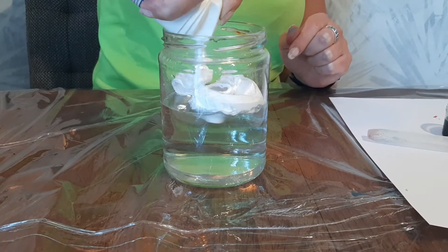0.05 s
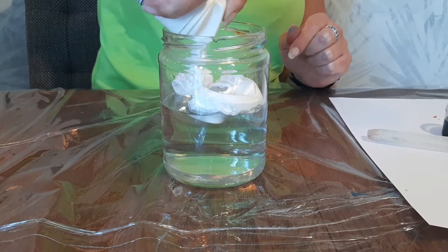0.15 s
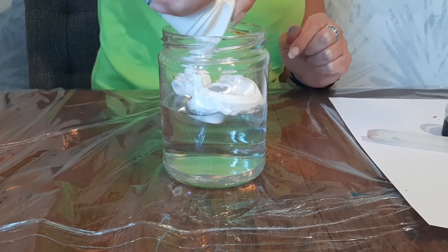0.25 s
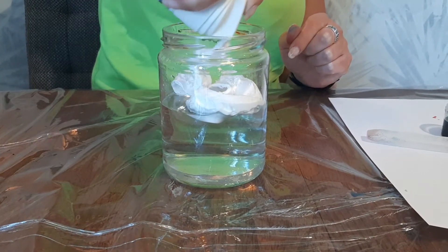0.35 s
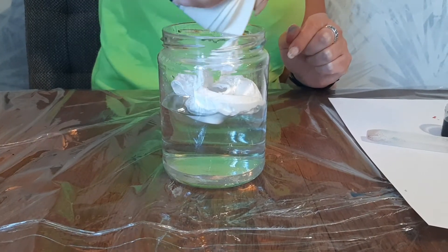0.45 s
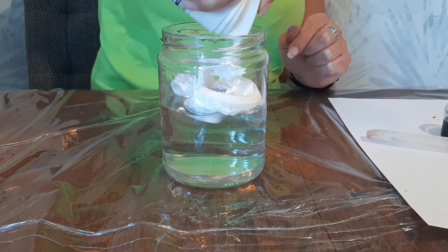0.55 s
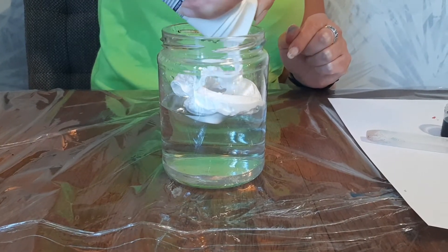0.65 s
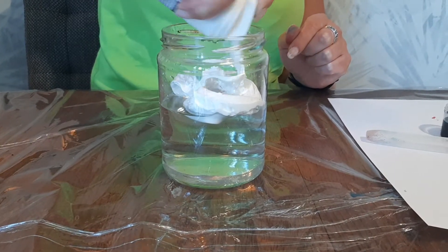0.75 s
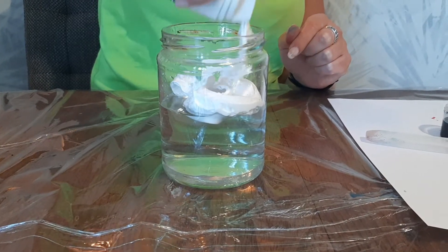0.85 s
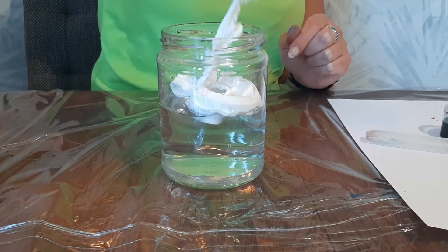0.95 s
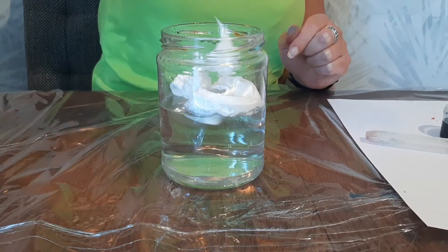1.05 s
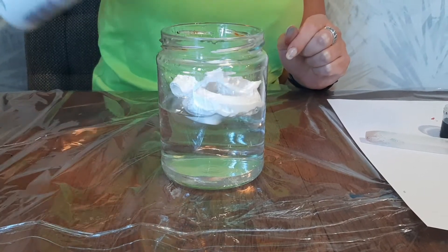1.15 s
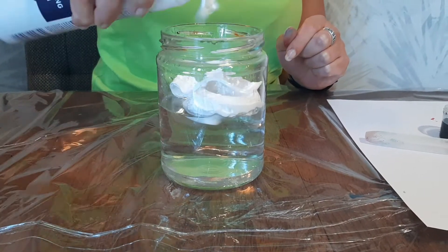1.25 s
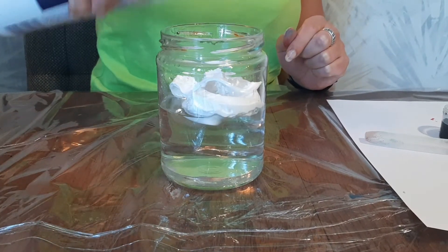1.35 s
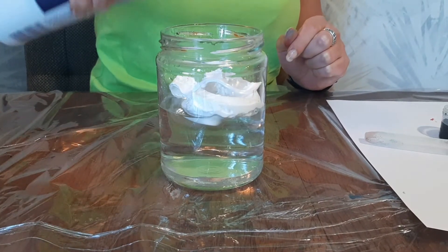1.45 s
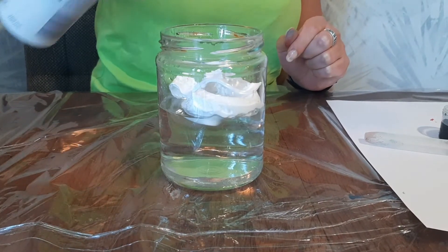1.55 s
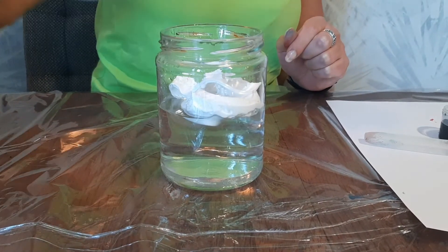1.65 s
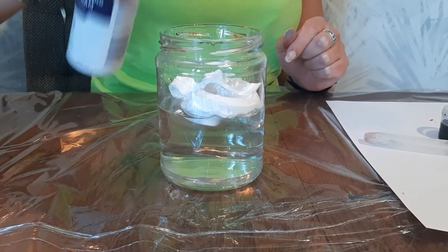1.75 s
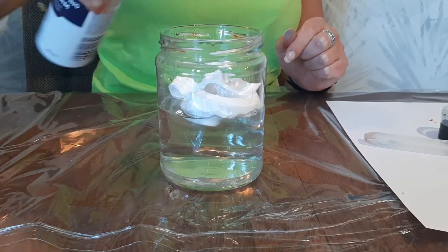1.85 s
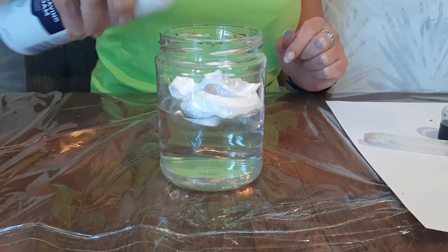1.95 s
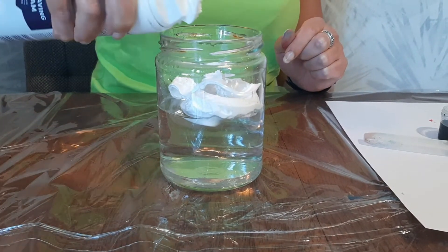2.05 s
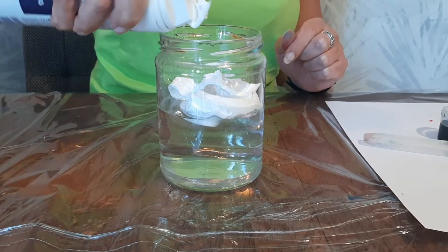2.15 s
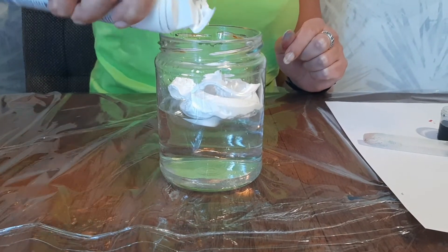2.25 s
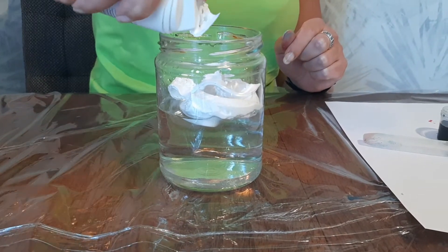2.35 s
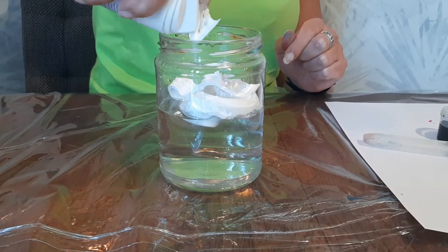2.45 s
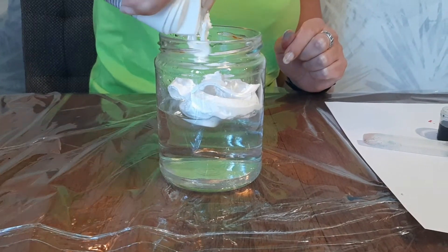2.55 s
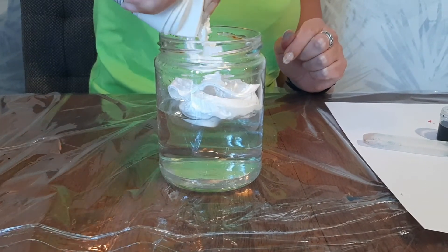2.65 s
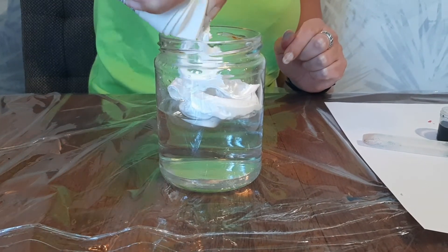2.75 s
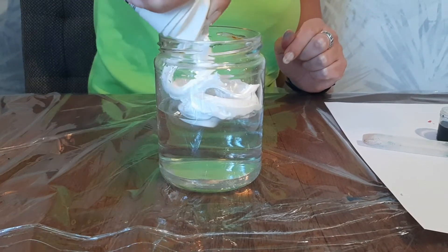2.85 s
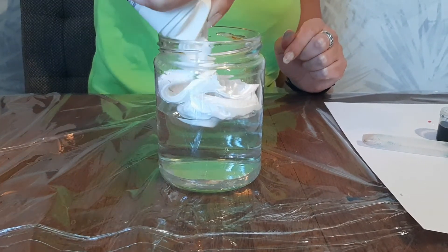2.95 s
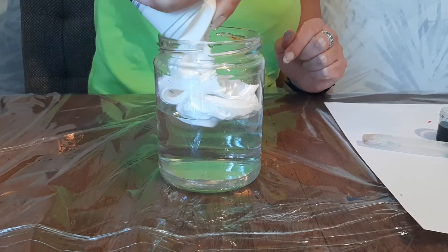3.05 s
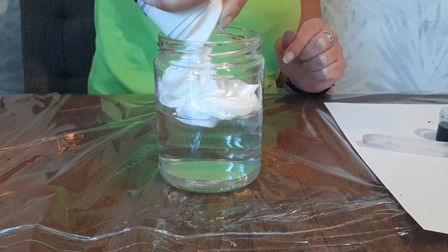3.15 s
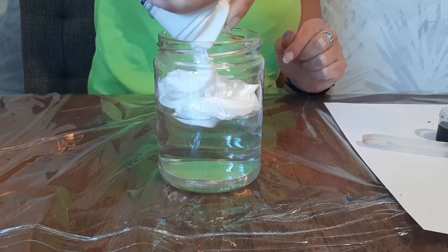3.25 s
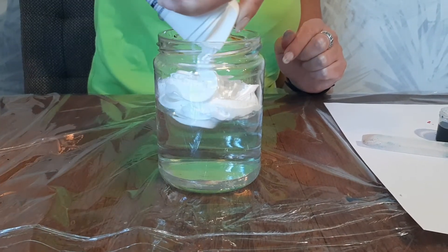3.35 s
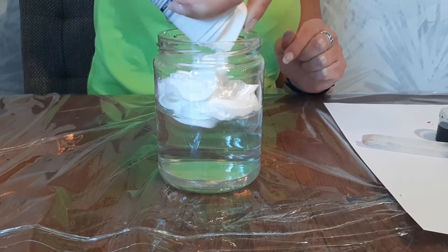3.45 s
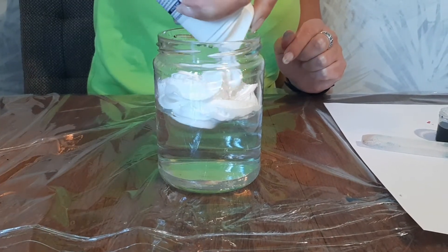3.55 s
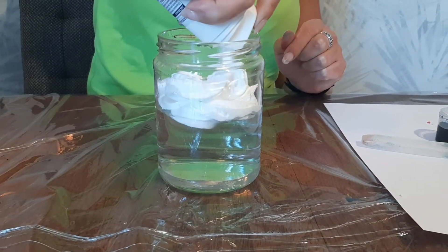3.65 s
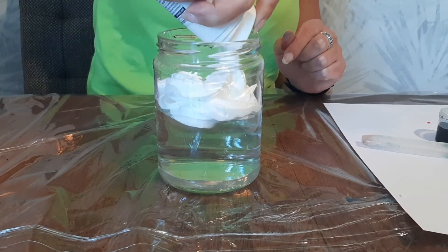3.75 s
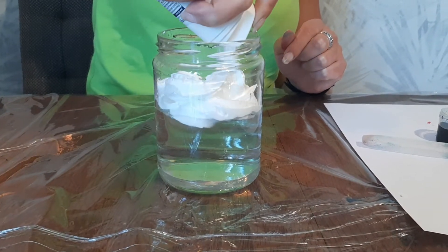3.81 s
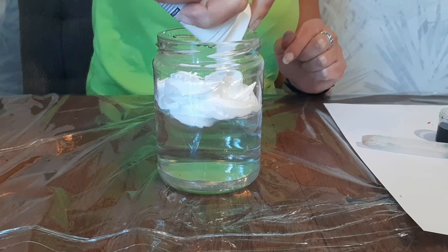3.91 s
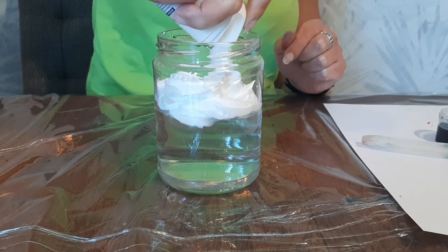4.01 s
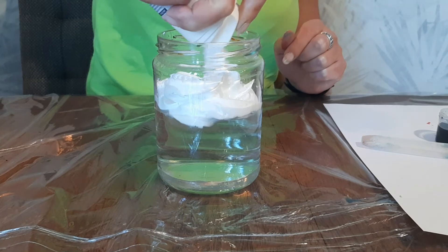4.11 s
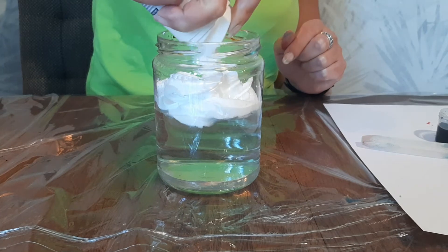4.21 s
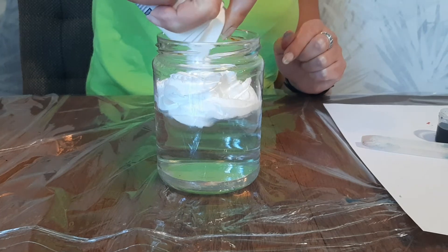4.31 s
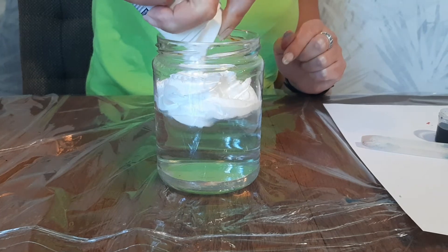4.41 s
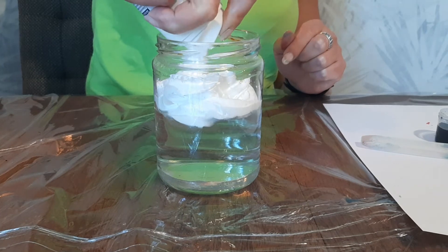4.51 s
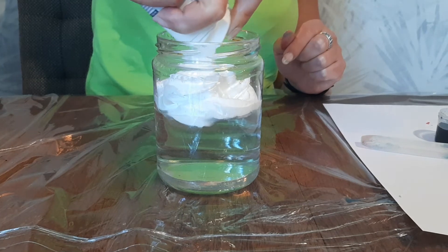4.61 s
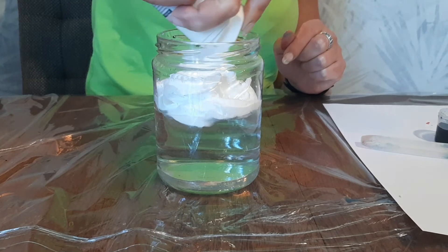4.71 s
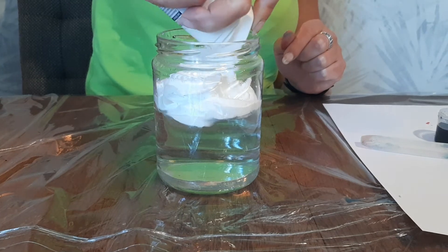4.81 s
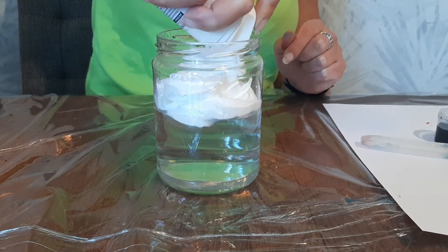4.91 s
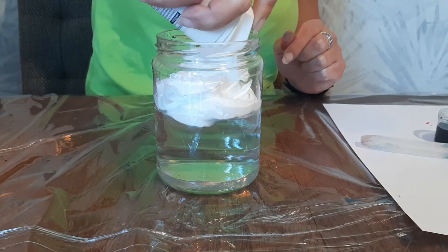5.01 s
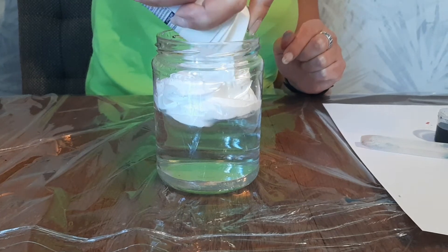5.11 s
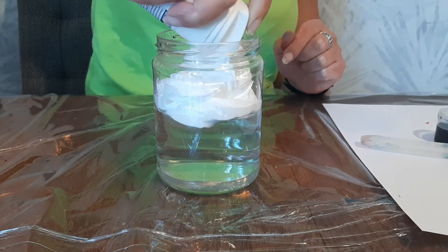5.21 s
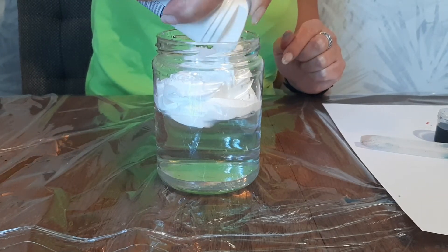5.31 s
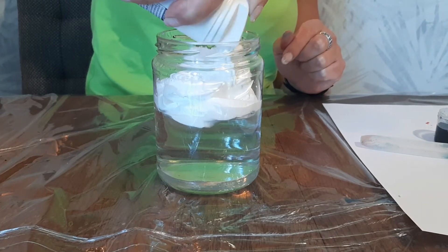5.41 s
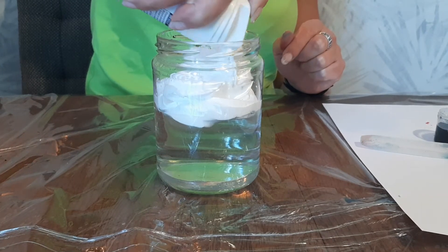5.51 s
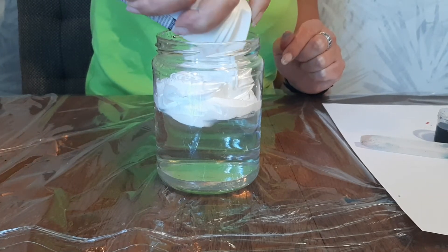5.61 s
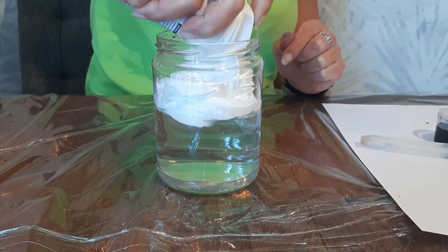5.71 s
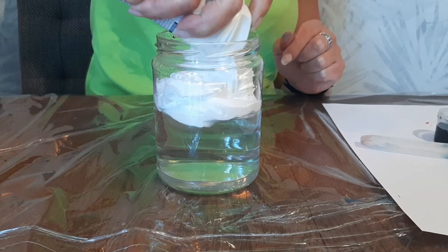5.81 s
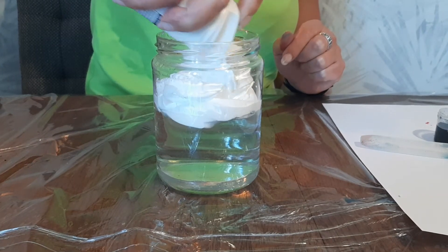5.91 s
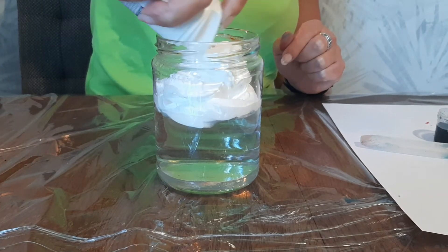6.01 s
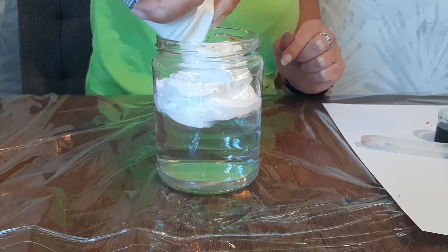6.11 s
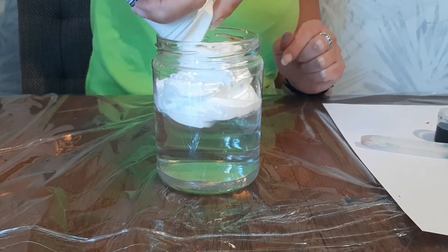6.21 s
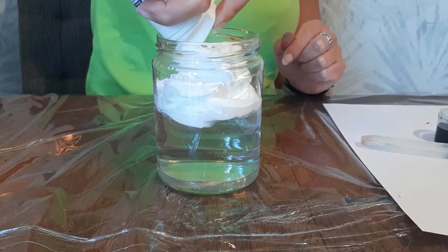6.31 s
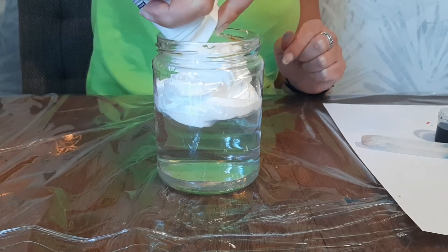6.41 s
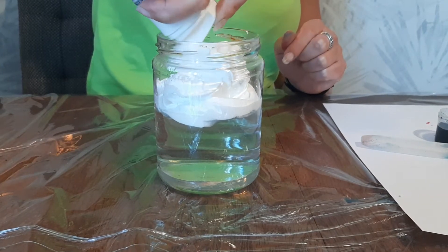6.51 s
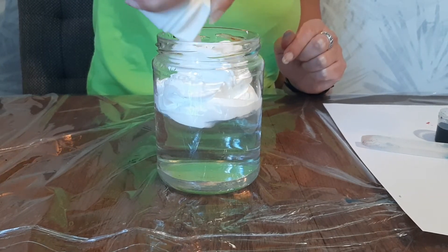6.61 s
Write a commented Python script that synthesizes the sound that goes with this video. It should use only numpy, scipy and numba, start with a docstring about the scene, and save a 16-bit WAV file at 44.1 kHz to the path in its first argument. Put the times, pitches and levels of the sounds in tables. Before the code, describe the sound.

A close, wide stereo pickup in a small, lightly reverberant room. From 0 to 0.75 s foam bursts from a can into a glass jar in two quick spurts: loud bright hiss, a hollow bottle-like tone around 750 Hz, pops and sharp snaps. The closing valve leaves a faint high whistle sliding down until about 1.1 s. Then it is nearly quiet, with tiny gas spits at 1.2 to 2 s and a dull table bump at 2.06 s. A short crisp spurt at 2.4 s starts a softer, wetter flow, swelling at 3.85 s and breaking into dense gulping, sputtering and crackling until 5.2 s, the hollow tone sinking. A low hum swells briefly near 5.2 s; a small knock follows at 5.3 s. After a faint spit, weaker gurgling spurts run 5.7 to 5.9 and 5.9 to 6.5 s, with a soft bump at 6.04 s.

```python
"""Foam sprayed into a jar

Shaving foam is sprayed from a can into a glass jar of water on a table in a small room.
The valve hisses as filtered turbulence noise; the air above the foam is a resonator, lower as the jar fills.
Pockets of gas surge through both, so the nozzle gulps and sputters; bursting cells crackle and snap.
The table is bumped twice and the nozzle ticks on the jar: decaying modes and a noisy thud.
The closing valve whistles, the nozzle spits faintly while the can is moved, and a low hum lies beneath."""
import sys
import numpy as np
from scipy import signal
from scipy.fft import rfft, irfft
from scipy.io import wavfile
from scipy.ndimage import uniform_filter1d
from numba import njit

SR = 44100
rng = np.random.default_rng(int(sys.argv[2]) if len(sys.argv) > 2 else 0)


def int16_out(signal):
    """Quantize to a 16-bit WAV file."""
    q = np.round(np.clip(np.atleast_2d(signal).T, -1, 1) * 32767)
    wavfile.write(sys.argv[1], SR, q.astype(np.int16))


N = 293970
TIME = np.arange(N) / SR
BINS = np.maximum(np.arange(N // 2 + 1) * SR / N, 1)   # frequencies of the spectrum, Hz

# Room noise: [frequency_hz, density_db]
QUIET_COLOUR = [(15, -74), (25, -22), (97, -23), (111, -11), (134, -5), (229, -28), (335, -17),
                (416, -30.5), (489, -28), (754, -33.5), (1130, -34.5), (1230, -35), (16000, -38.5)]
QUIET_DB = -68.5
HUM_HZ, HUM_DB = 125, -73.5
SWELL_S, SWELL_DB, SWELL_WIDTH_S = 5.2, 27.5, 0.12   # the hum swells once

# Flow through the valve, one row a stretch, levels relative: [start_s, end_s, hiss_db, jar_db,
# hiss_change_by_end_db, jar_change_by_end_db, midway_sag_db, wet_splutter_re_hiss_db,
# fine_fizz_re_hiss_db, small_gulps_re_flow_db]
PUSHES = [(0.0, 0.206, -21.5, -22.5, -2, -9, 2, -18.5, -8.5, -8.5),
          (0.23, 0.742, -27, -31.5, 1.5, -2.5, 4.5, -17.5, -11, -7.5),
          (2.424, 2.465, -32, -38.5, -5, -2.5, -5, -16, -23, -22.5),
          (2.518, 2.976, -43.5, -36, -2.5, 1, 3.5, -7.5, -14.5, -9),
          (3.007, 3.853, -44.5, -36.5, 5, 2.5, 0.1, -7, -16, -12.5),
          (3.873, 4.228, -31, -31, -1.5, 0, 0.5, -6.5, -13, -3),
          (4.299, 5.19, -40.5, -49.5, 2, 14, 0, 1, -14.5, -12),
          (5.706, 5.892, -55, -54.5, 15, 9, -0.5, 0, -19, -2),
          (5.926, 6.484, -52.5, -45.5, 6, 4, -2, -0.5, -14.5, -5.5)]
ATTACK_S, CLOSE_DB_PER_S = 0.019, 311   # the valve opens fast and chokes off
LEAK_S, LEAK_DB = 0.043, -14   # it leaks just before it opens

# Colours of the jet: [frequency_hz, density_db]
FIRST_JET = [(1100, -7), (1600, -16.5), (2050, 2), (2400, -19.5), (2800, -11.5), (3900, -6.5), (4600, -7.5),
             (6200, -2), (7000, -3.5), (7700, -14.5), (12000, -9.5), (15500, -13)]
BURST_JET = [(1100, -21), (1750, -28), (2300, -8), (2900, 4), (4000, -17), (4800, -0.5), (5600, 7.5),
             (6700, 3.5), (8000, -20), (12000, -13), (15500, -17)]
THIN_JET = [(1100, -4), (1600, -31), (2200, -18), (2600, -0.5), (3300, 2), (4200, -7.5), (5100, -1),
            (6200, 1), (7000, -4), (8000, -14), (12500, -9.5), (15500, -18.5)]
GENTLE_JET = [(1100, 5), (1650, -5.5), (2200, -2.5), (2700, -3), (3400, -2.5), (6300, -0.5), (6900, -4.5),
              (7600, -26.5), (12500, -23.5), (15500, -27)]
FULL_JET = [(1100, 6.5), (1350, 3), (1850, 0.5), (2550, -4.5), (3200, -10.5), (4100, -3.5), (5400, -1),
            (6500, -5.5), (7200, -12), (8200, -18), (12000, -14.5), (15500, -18)]
LAST_JET = [(1100, 20), (1400, 11.5), (2050, 8.5), (2600, 2.5), (3300, 4), (4000, 1), (5200, 1.5),
            (6300, 3), (7000, -3), (8000, -18), (12000, -16.5), (15500, -19)]
# one colour for each stretch of flow
JET_COLOURS = [FIRST_JET, FIRST_JET, BURST_JET, THIN_JET, GENTLE_JET,
               FULL_JET, FULL_JET, LAST_JET, LAST_JET]

# Upper air modes of the jar: [frequency_hz, width_hz, level_db]
JAR_MODES = [(1242.6, 24, 0.5), (1336, 5.6, 8), (1447, 7.1, -0.5), (1696, 63, 2.5), (2034, 190, -4.5),
             (2488, 84, -0.5), (3060, 19, 0), (3260, 62, -7.5), (3920, 40, -1), (4210, 41, -2),
             (4830, 310, -5.5), (5990, 13, 2), (6600, 32, -3)]
# Main air resonance, sinking overall as foam fills the neck: [time_s, pitch_hz]
JAR_PITCH = [(0.0, 773), (0.4, 790), (0.72, 719), (2.45, 811), (3.25, 776), (3.9, 714), (4.4, 675),
             (4.7, 652), (5.1, 624), (6.5, 644)]
# Narrow modes beside the main resonance: [frequency_hz, width_hz, level_db]
SIDE_MODES = [(768.3, 12, -6.5), (852.5, 19, 0.5), (958.3, 11, 8)]
# Flow noise that drives the jar's air: [frequency_hz, density_db]
JAR_DRIVE = [(330, -10), (450, 8.5), (530, 6.5), (650, 4), (850, -0.5), (1000, -12.5), (1200, -27),
             (1600, -25.5)]
# Dull flutter of foam piling up: [frequency_hz, density_db]
FLUTTER_COLOUR = [(30, -28), (80, -36.5), (108, -15), (128, 1), (150, -15.5), (190, -1), (222, 3.5),
                  (260, -5), (300, 1.5), (380, -9.5), (520, -27.5)]
# around a middling flow, the flutter follows this share of its swing in decibels
FLUTTER_FLOW_DB, FLUTTER_FOLLOWS = -32, 0.77

# Large gas pockets leaving the nozzle, levels relative: [start_s, length_s, jar_db, hiss_re_jar_db]
GULPS = [(0.085, 0.0034, -21.5, 3), (0.126, 0.0033, -20, 1), (0.19, 0.006, -23, -13),
         (0.576, 0.015, -26, -5), (0.682, 0.013, -22.5, -3), (0.725, 0.034, -28.5, -17.5),
         (2.583, 0.023, -33, -11), (2.85, 0.014, -30.5, -19), (2.939, 0.005, -27.5, -16),
         (3.094, 0.018, -32, -11), (3.138, 0.015, -29, -9.5), (3.216, 0.0057, -23.5, -22),
         (3.301, 0.035, -31.5, -19), (3.424, 0.0061, -30, -13), (3.586, 0.0074, -29.5, -9),
         (3.61, 0.013, -29, -11), (3.692, 0.0054, -32, -3), (3.849, 0.0056, -20, -7),
         (3.858, 0.011, -21.5, -1.5), (3.875, 0.024, -21, -4.5), (3.913, 0.0052, -23.5, -2.5),
         (3.94, 0.0069, -25.5, 0), (3.966, 0.0046, -21, -15), (3.987, 0.015, -21.5, -14),
         (4.022, 0.0046, -19.5, -3.5), (4.052, 0.0072, -25, -3), (4.087, 0.016, -22, -6.5),
         (4.16, 0.0023, -14.5, -9), (4.18, 0.0044, -20.5, -1.5), (4.193, 0.021, -27.5, 0.5),
         (4.238, 0.0094, -22, -6), (4.269, 0.017, -21, -6), (4.302, 0.019, -29.5, 0.5),
         (4.335, 0.014, -22, -8.5), (4.367, 0.0067, -24, -6.5), (4.394, 0.013, -20.5, -10),
         (4.43, 0.0069, -26, 0), (4.439, 0.014, -22.5, -6.5), (4.468, 0.019, -24.5, -2.5),
         (4.503, 0.005, -21, -9), (4.513, 0.0089, -24.5, -1.5), (4.54, 0.015, -23.5, -6.5),
         (4.569, 0.0047, -23, -12), (4.579, 0.0036, -17, -14), (4.591, 0.012, -22.5, -6),
         (4.63, 0.0071, -18, -12), (4.64, 0.0041, -18.5, -7), (4.657, 0.01, -24.5, -6),
         (4.682, 0.011, -21.5, -7), (4.712, 0.013, -24.5, -4), (4.735, 0.0075, -22, -7.5),
         (4.755, 0.012, -22.5, -3), (4.81, 0.0047, -23, -6), (4.82, 0.0085, -25.5, -2),
         (4.855, 0.0054, -23.5, -4.5), (4.875, 0.016, -24, -4.5), (4.914, 0.0081, -22.5, -10),
         (4.94, 0.011, -27.5, 1), (4.966, 0.012, -24, -2), (4.992, 0.0077, -25, -2),
         (5.006, 0.0049, -19.5, -6.5), (5.033, 0.0091, -27.5, -0.5), (5.067, 0.0038, -26, -4),
         (5.075, 0.0069, -21, -8), (5.105, 0.014, -25.5, -3.5), (5.119, 0.018, -26, -9.5),
         (5.154, 0.0043, -19.5, -22.5), (5.173, 0.015, -29.5, -4.5), (5.712, 0.0069, -29, -3.5),
         (5.764, 0.013, -27.5, -10.5), (5.793, 0.0034, -22, -7.5), (5.83, 0.0041, -32, -9),
         (5.85, 0.0074, -25.5, -18), (5.868, 0.0034, -22, -17), (5.89, 0.012, -30, -33)]
BLOCK_S, BLOCK_DB = 0.01, -4   # a pocket blocks the nozzle before it breaks out; dB if wholly blocked
# lesser pockets: middle gap and length, greatest deviation in level
SMALL_GULP_GAP_S, SMALL_GULP_S, SMALL_GULP_SPREAD_DB = 0.045, 0.0078, 2

# Foam cells that snap loudly in the jet: [start_s, peak_db]
SNAPS = [(0.151, -17), (0.193, -22), (0.437, -27), (0.442, -17), (0.718, -19.5), (0.725, -24), (0.73, -27),
         (0.774, -18), (2.423, -21), (2.442, -30), (2.451, -23), (2.479, -24.5), (2.542, -31), (2.551, -28),
         (2.728, -29), (2.867, -37), (3.028, -28), (3.177, -28), (3.45, -27), (3.584, -25), (3.696, -23.5),
         (4.245, -24), (4.282, -18.5), (4.349, -31.5), (4.4, -32), (4.519, -22.5), (4.544, -27),
         (4.57, -25), (4.688, -31), (4.713, -27), (4.736, -24), (4.767, -27), (4.879, -18.5), (4.916, -25),
         (4.94, -27), (4.97, -25), (5.062, -19.5), (5.093, -25), (5.11, -43), (5.157, -27), (5.713, -32.5),
         (5.768, -27), (6.13, -32), (6.292, -34), (6.312, -30.5), (6.36, -32)]
SNAP_DECAY_S = 0.00031
# Hollows in the foam that colour the jet as a peak or a dip: [start_s, length_s, frequency_hz, level_db]
HOLLOWS = [(0.38, 0.33, 2540, 10.5), (0.654, 0.15, 1880, 10.5), (0.66, 0.16, 3270, -9),
           (2.52, 0.64, 3660, 4), (3.174, 0.27, 2630, 8.5), (3.84, 0.16, 3840, 10.5),
           (4.247, 0.36, 2580, 7.5), (4.277, 0.45, 5340, 4.5), (4.9, 0.23, 4050, 5.5),
           (6.1, 0.45, 6270, 3.5)]

WHISTLE_S, WHISTLE_LENGTH_S, WHISTLE_DB, WHISTLE_FADE_DB_PER_S = 0.77, 0.31, -62.5, 27
WHISTLE_HZ, WHISTLE_SAG_HZ_PER_S = 6810, 2600
# Faint spits of the nozzle: [start_s, level_db, t60_s]
SPITS = [(1.23, -66, 0.31), (1.328, -58, 0.3), (1.512, -68.5, 0.29), (1.946, -60.5, 0.38),
         (2.375, -67, 0.21), (5.668, -64, 0.57)]
# Colour of escaping gas: [frequency_hz, density_db]
SPIT_COLOUR = [(1500, -34), (2600, -13), (3600, -1.5), (6200, 6), (8000, -10), (15500, -11)]

# Bumps on table and jar: [start_s, level_db, contact_cutoff_hz, low_cut_hz]
BUMPS = [(2.062, -24, 1490, 79.2), (5.317, -27.5, 810, 800), (6.044, -28, 690, 109)]
# Modes of table and jar: [frequency_hz, level_db, t60_s]
TABLE_MODES = [(122.3, -23, 1), (197.6, -15.5, 0.34), (223.4, -4.5, 0.29), (285, -15.5, 0.49),
               (354, -13, 0.16), (509, -12, 0.061), (630, -23, 0.082), (843, -24, 0.14), (1270, -27, 0.13),
               (1390, -22.5, 0.21), (1763, -28, 0.11), (2880, -27, 0.13), (3420, -28.5, 0.082)]
# Dull thud of a bump: [frequency_hz, density_db]
THUD_COLOUR = [(40, -31), (120, -15), (210, 7.5), (300, 11), (430, 0), (530, 4), (680, -7), (1000, -18),
               (1400, -2), (1800, -26.5), (2200, -18.5), (6000, -11), (9000, -23)]

# Stereo width: [frequency_hz, side_re_mid_db]
WIDTH = [(60, -11), (200, -19), (380, -8), (700, -5), (1290, -2), (2380, 4), (4400, 2.5), (8000, 4),
         (15000, -0.5)]
MIC_LAG_S = 0.0001   # the left microphone leads; this sets how its phase lead grows with frequency
# Decay of the room: [frequency_hz, t60_s]
ROOM_T60 = [(125, 0.57), (500, 0.29), (1500, 0.36), (5000, 0.31), (14000, 0.22)]
# Level of the room's tail: [frequency_hz, level_re_direct_db]
ROOM_DB = [(125, -4.5), (300, -4), (700, -16.5), (1500, -5), (5000, -5), (14000, -6.5)]
CUTOFF_HZ = 15900


def from_db(db):
    """Logarithmic level: decibels become an amplitude gain."""
    return 10 ** (np.asarray(db) / 20)


def rms_one(x):
    """Normalization: a signal is scaled to unit mean power."""
    return x / np.sqrt(np.mean(x ** 2) + 1e-20)


def at_hz(points, hz):
    """Interpolation: a table is read on a logarithmic frequency axis."""
    f, value = np.transpose(points)
    return np.interp(np.log(hz), np.log(f), value)


def cut(x, hz, kind, order=2):
    """Linear filtering: a Butterworth response, flat in its pass band."""
    return signal.sosfilt(signal.butter(order, hz, kind, fs=SR, output="sos"), x)


def drift(rate_hz):
    """Slow random fluctuation: low-passed noise with spread 1."""
    spectrum = rfft(rng.standard_normal(N))
    return rms_one(irfft(spectrum / (1 + (BINS / rate_hz) ** 2), N))


def noise_bins():
    """Diffuse field: the spectrum of white stereo noise, alike in the bass and diffuse in the treble."""
    mid, side = rfft(rng.standard_normal((2, N)))
    width = from_db(at_hz(WIDTH, BINS))
    return (mid + side * width * [[1], [-1]]) / np.sqrt(1 + width ** 2)


def noise(colour):
    """Spectral shaping: white noise weighted to a given colour, rms 1."""
    spectrum = rfft(rng.standard_normal(N))
    return rms_one(irfft(spectrum * from_db(at_hz(colour, BINS)), N))


def evened(x, span_s):
    """Envelope normalization: division by the running rms removes chance swells of a noise."""
    return x / np.sqrt(uniform_filter1d(x ** 2, max(int(span_s * SR), 8)) + 1e-12)


def fading(power, decay_s):
    """Exponential relaxation: power builds up and dies away with one time constant."""
    r = np.exp(-1 / (decay_s * SR))
    return signal.lfilter([1 - r], [1, -r], power + 1e-18)


def decaying(t, t60):
    """Exponential decay: amplitude falls by 60 dB in the time t60."""
    return np.exp(-np.log(1000) * t / t60)


def dying(s, t60):
    """Impulsive excitation: a gain jumps to 1 at a moment and decays exponentially."""
    return (TIME >= s) * decaying(np.clip(TIME - s, 0, 10 * t60), t60)


def pops(per_s, spread_db):
    """Shot process: foam cells burst at random instants with random energies, mean 1."""
    bursting = rng.random(N) < per_s / SR
    level_db = spread_db * np.clip(rng.standard_normal(N), -2, 2)
    energy = bursting * from_db(level_db) ** 2
    return energy / energy.mean()


def grainy(cells, share, decay_s):
    """Power mixing: of a mean power of 1, a share comes from bursting cells."""
    return 1 - share + share * fading(cells, decay_s)


@njit
def moving_resonance(x, hz, width_hz):
    """Forced oscillation: a two-pole resonance whose centre moves, gain 1 on top."""
    y, r = np.zeros_like(x), np.exp(-np.pi * width_hz / SR)
    for i in range(2, len(x)):
        driven = (1 - r * r) / 2 * (x[i] - x[i - 2])
        y[i] = driven + 2 * r * np.cos(2 * np.pi * hz[i] / SR) * y[i - 1] - r * r * y[i - 2]
    return y


def resonance(x, hz, width_hz):
    """Forced oscillation: a two-pole resonance with a steady centre."""
    return moving_resonance(x, np.full(N, float(hz)), float(width_hz))


def background(waver_hz=1.7):
    """Stationary noise and frequency modulation: room noise with a low hum that wavers and swells."""
    phase = 2 * np.pi * np.cumsum(HUM_HZ + waver_hz * drift(4.8)) / SR
    hum = rms_one(np.sin(phase))
    air = rms_one(irfft(noise_bins() * from_db(at_hz(QUIET_COLOUR, BINS)), N))
    hum_db = HUM_DB + SWELL_DB * np.exp(-((TIME - SWELL_S) / SWELL_WIDTH_S) ** 2)
    return from_db(QUIET_DB) * air + from_db(hum_db) * hum


def push(start, end, db, change_db, sag_db):
    """Flow control by a valve: a leak, a quick opening, a hold as the finger eases and firms, the closing."""
    along = np.clip((TIME - start) / (end - start), 0, 1)
    leak = from_db(LEAK_DB) * (TIME > start - LEAK_S)
    opening = np.maximum(np.clip((TIME - start) / ATTACK_S + 1, 0, 1), leak)   # fully open at start
    held_db = db + change_db * along - sag_db * np.sin(np.pi * along)
    return opening * from_db(held_db - CLOSE_DB_PER_S * np.clip(TIME - end, 0, 1))


def pockets(rows, sag=0.4, snap=0.09, count=24):
    """Pressure release: rows of (s, length s, dB) become power surges, hardest as each breaks out."""
    power = np.zeros(N + SR)
    for s, length, db in rows:
        shape = np.exp(-sag * np.linspace(0, 1, max(int(length * SR), 2)))
        shape[:count] += snap * len(shape) / count   # the foam skin tears with a snap
        first = int(s * SR)
        power[first:first + len(shape)] += from_db(db) ** 2 * shape / shape.mean()
    return power[:N]


def small_gulps(count=400):
    """Two-phase flow: lesser gas pockets follow each other unevenly, mean power 1."""
    gap, length, size = rng.uniform(-1, 1, (count, 3)).T
    starts = np.cumsum(SMALL_GULP_GAP_S * 2 ** gap)
    lengths = SMALL_GULP_S * (1 + 0.5 * length)
    rows = np.transpose([starts, lengths, SMALL_GULP_SPREAD_DB * size])
    power = pockets(rows[rows[:, 0] < N / SR])
    return power / power.mean()


def blocking():
    """Flow obstruction: the share of power that passes while large pockets gather."""
    blocked = np.zeros(N)
    for s, *_ in GULPS:
        blocked[(TIME > s - BLOCK_S) & (TIME < s)] = 1
    return from_db(BLOCK_DB * fading(blocked, decay_s=0.0093)) ** 2


def flow(bed_db=-2.0, small_hiss_db=-4.5):
    """Common excitation: one flow powers jar and jet, broken by the same cells and small gulps."""
    cells = pops(per_s=180, spread_db=0.5)
    small = fading(small_gulps(), decay_s=0.00029)
    in_jar = grainy(cells, share=0.68, decay_s=0.0014)
    in_jet = grainy(cells, share=0.073, decay_s=0.002)
    in_jet = in_jet * grainy(pops(per_s=140, spread_db=2.5), share=0.14, decay_s=0.0007)   # lesser snaps
    jar, hiss = np.zeros((2, N))
    for start, end, hiss_db, jar_db, hiss_change, jar_change, sag, _, _, small_db in PUSHES:
        lumps = from_db(small_db) ** 2 * small
        jar_gain = push(start, end, jar_db + bed_db, jar_change, sag)
        hiss_gain = push(start, end, hiss_db + bed_db, hiss_change, sag)
        jar += jar_gain ** 2 * (in_jar + lumps)
        hiss += hiss_gain ** 2 * (in_jet + from_db(small_hiss_db) ** 2 * lumps)
    return np.array([jar, hiss]) * blocking()


def nozzle(plain_db=-12.0, pocket_hz=230):
    """Turbulence noise and resonance: the jar's upper modes and shifting foam pockets ring."""
    source = from_db(plain_db) * rng.standard_normal(N)
    for hz, width_hz, db in JAR_MODES:
        source += from_db(db) * resonance(rng.standard_normal(N), hz, width_hz)
    for hz in np.geomspace(2300, 6600, num=6):
        centre = hz * np.exp(0.07 * drift(7))
        level = from_db(3 * drift(16))
        source += level * moving_resonance(rng.standard_normal(N), centre, float(pocket_hz))
    return source


def jet(source, colour):
    """Band splitting: the jet of one stretch as wet splutter, hiss and fine fizz, each of rms 1."""
    size = source.shape[-1]
    hz = np.maximum(np.arange(size // 2 + 1) * SR / size, 1)
    shaped = rfft(source) * from_db(at_hz(colour, hz))
    edges = [1050, 2400, 7500, 17000]
    return np.array([rms_one(irfft(shaped * (hz >= low) * (hz < high), size))
                     for low, high in zip(edges, edges[1:])])


def jet_bands(scatter_db=-6.0):
    """Decorrelation: the three jet bands through all stretches, scattered to both sides."""
    source, bands = nozzle(), np.zeros((3, 2, N))
    # a copy shifted by a second serves as an independent side signal
    source = source + from_db(scatter_db) * np.roll(source, SR) * [[1], [-1]]
    for (start, end, *_, wet_db, fizz_db, _), colour in zip(PUSHES, JET_COLOURS):
        during = (TIME >= start - LEAK_S) & (TIME < end + 0.5)
        gains = from_db([wet_db, 0, fizz_db])[:, None, None]
        bands[..., during] = jet(source[:, during], colour) * gains
    return bands


def jar_air(power, hz, width_hz, flutter_db, direct_db=-2.5, ring_db=-7.5, ring_width_hz=200,
            overtone_hz=2600, overtone_db=-16.5, overtone_width_hz=100):
    """Cavity resonance: air between foam and rim rings like a bottle; piling foam flutters below it."""
    ringing = rms_one(moving_resonance(noise(JAR_DRIVE), hz, float(width_hz)))
    overtone = rms_one(resonance(rng.standard_normal(N), overtone_hz, overtone_width_hz))
    tone = evened(ringing, span_s=0.011) + from_db(overtone_db) * overtone
    bottle = cut(np.sqrt(power) * tone, 350, "high")
    puffs = moving_resonance(bottle, hz, float(ring_width_hz))   # each puff rings on
    bottle = from_db(direct_db) * bottle + from_db(ring_db) * puffs
    bottle = bottle + sum(from_db(db) * resonance(bottle, f, width) for f, width, db in SIDE_MODES)
    flutter = rms_one(cut(noise(FLUTTER_COLOUR), 680, "low", order=4))
    middling = from_db(FLUTTER_FLOW_DB)
    piling = middling * (np.sqrt(fading(power, decay_s=0.0083)) / middling) ** FLUTTER_FOLLOWS
    return bottle + from_db(flutter_db) * cut(piling * flutter, 57, "high")


def gulps(jar_db, hiss_db):
    """Pressure surge: the large gas pockets drive both the jar's air and the jet."""
    in_jar = [(s, length, db + jar_db) for s, length, db, _ in GULPS]
    in_jet = [(s, length, db + hiss + hiss_db) for s, length, db, hiss in GULPS]
    return pockets(in_jar), pockets(in_jet)


def gulp_pops(jar_hz, pop_db=-4.5, width_hz=110):
    """Impulse response: each large pocket bursts with a pop that sets the jar's air ringing at once."""
    kicks = np.zeros(N)
    for s, _, db, _ in GULPS:
        kicks[int(s * SR)] = from_db(db + pop_db)
    kicks = kicks + 1e-12 * rng.standard_normal(N)
    ring = moving_resonance(kicks, jar_hz, float(width_hz)) * SR / (2 * np.pi * width_hz)
    return cut(ring, [310, 1700], "band")


def snaps():
    """Sudden release: the power of each loud snap starts at once and relaxes in a moment."""
    power = np.zeros(N)
    for s, db in SNAPS:
        power[int(s * SR)] += from_db(db) ** 2 * SNAP_DECAY_S * SR
    return fading(power, SNAP_DECAY_S)


def hollows(x, width_hz=230, wander=0.0063):
    """Local resonance: each hollow forms, wavers in pitch and closes again."""
    for s, length, hz, db in HOLLOWS:
        formed = np.sqrt(np.abs(np.sin(np.pi * np.clip((TIME - s) / length, 0, 1))))
        centre = hz * np.exp(wander * drift(6.4))
        ringing = np.array([moving_resonance(side, centre, float(width_hz)) for side in x])
        x = x + (from_db(db) - 1) * formed * ringing
    return x


def spray(wet_gulp_db=-10.5, fizz_gulp_db=-2.5, wet_snap_db=-6.0, fizz_snap_db=-11.5):
    """Amplitude modulation: flow, gulps, snaps and bursting cells drive the jet; flow and gulps the jar."""
    jar_flow, jet_flow = flow()
    jar_surge, jet_surge = gulps(jar_db=-4.0, hiss_db=-2.6)
    jet_surge, snap = fading(jet_surge, decay_s=0.001), snaps()
    # tiny cells crackle in all bands, big wet bubbles only in the splutter
    crackle = grainy(pops(per_s=500, spread_db=0.5), share=0.22, decay_s=0.00036)
    bubbles = grainy(pops(per_s=260, spread_db=0.0), share=1.0, decay_s=0.0055)

    wet, hiss, fizz = jet_bands()
    wet_power = crackle * bubbles * (jet_flow + from_db(wet_gulp_db) ** 2 * jet_surge)
    wet = wet * np.sqrt(wet_power + from_db(wet_snap_db) ** 2 * snap)
    hiss_snaps = cut(hiss * np.sqrt(snap), 3000, "high")
    hiss = hiss * np.sqrt(crackle * (jet_flow + jet_surge)) + hiss_snaps
    fizz_power = crackle * (jet_flow + from_db(fizz_gulp_db) ** 2 * jet_surge)
    fizz = fizz * np.sqrt(fizz_power + from_db(fizz_snap_db) ** 2 * snap)
    whole_jet = cut(wet + cut(hiss, 7500, "low", order=8) + fizz, 340, "high")

    jar_hz = np.interp(TIME, *np.transpose(JAR_PITCH))
    jar_power = jar_flow + fading(jar_surge, decay_s=0.00085)
    jar = jar_air(jar_power, jar_hz, width_hz=71.5, flutter_db=-15.0) + gulp_pops(jar_hz)
    return hollows(whole_jet), jar


def whistle(width_hz=150):
    """Flow tone: the last gas fizzes and whistles through the closing valve, falling with the pressure."""
    age = np.clip(TIME - WHISTLE_S, 0, WHISTLE_LENGTH_S)
    sounding = np.sqrt(fading((age > 0) & (age < WHISTLE_LENGTH_S), decay_s=0.0084))
    hz = WHISTLE_HZ - WHISTLE_SAG_HZ_PER_S * age
    tone = rms_one(moving_resonance(rng.standard_normal(N), hz, float(width_hz)))
    level = from_db(WHISTLE_DB - WHISTLE_FADE_DB_PER_S * age)
    return level * sounding * (tone + noise(SPIT_COLOUR))


def spits():
    """Decaying turbulence: trapped gas escapes in short puffs of noise."""
    return sum(from_db(db) * dying(s, t60) for s, db, t60 in SPITS) * noise(SPIT_COLOUR)


def bumps(thud_db=-10.5, thud_t60=0.28, tick_db=3.0, tick_t60=0.0077):
    """Impact excitation: a thud, a tick and modes of table and jar; softer contact gives less treble."""
    out, t = np.zeros(N), TIME[:SR // 2]
    thud = evened(noise(THUD_COLOUR), span_s=0.0078)
    ring = sum(from_db(db) * decaying(t, t60) * np.sin(2 * np.pi * hz * t) for hz, db, t60 in TABLE_MODES)
    for s, db, contact_hz, low_hz in BUMPS:
        during = slice(int(s * SR), int(s * SR) + len(t))
        tick = cut(rng.standard_normal(len(t)), 4500, "low")
        blow = ring + from_db(thud_db) * decaying(t, thud_t60) * thud[during]
        blow += from_db(tick_db) * decaying(t, tick_t60) * tick
        softened = cut(blow, min(contact_hz, SR / 3), "low", order=1)
        out[during] += from_db(db) * cut(softened, low_hz, "high")
    return out


def two_ears(x, spread_db, scatter, size=4096):
    """Interchannel phase: the left leads; early echoes off glass and table scatter the treble more."""
    early = (rng.standard_normal(N) * dying(0, 0.025))[:size]
    echo = rfft(early / np.linalg.norm(early))
    hz = np.linspace(1, SR / 2, len(echo))
    width = from_db(at_hz(WIDTH, hz) + spread_db)
    lead = np.tanh(2 * np.sin(2 * np.pi * hz * MIC_LAG_S))
    side = width * (scatter * (0.4 * echo.real + 1j * echo.imag) + 1j * lead)
    spectrum = (1 + side * [[1], [-1]]) / np.sqrt(1 + width ** 2)
    response = np.roll(irfft(spectrum, size), size // 2, axis=-1)   # centred, so that phase may lead
    return signal.fftconvolve(x, response, mode="same", axes=-1)


def room(x, gap_s=0.0096):
    """Reverberation: a diffuse tail decays at its own pace in each octave."""
    white, t, tail = noise_bins(), TIME[:SR * 2 // 3], 0
    edges = 45 * 2.0 ** np.arange(10)
    for low, high in zip(edges, edges[1:]):
        hz = np.sqrt(low * high)
        decay = (t > gap_s) * decaying(t, at_hz(ROOM_T60, hz))
        band = irfft(white * (BINS >= low) * (BINS < high), N)[:, :len(t)]
        tail = tail + from_db(at_hz(ROOM_DB, hz)) * band * decay / np.linalg.norm(decay)
    return signal.fftconvolve(x, tail, axes=-1)[:, :N]


def scene():
    """Superposition: can, jar and table, direct and reverberant, add to the background."""
    jet_sound, jar = spray()
    hissing = jet_sound + spits() + whistle()
    body = np.tile(jar + bumps(), (2, 1))
    direct = two_ears(hissing, spread_db=-2.0, scatter=1.05) + two_ears(body, spread_db=1.0, scatter=0.45)
    return direct + room(hissing + body) + background()


def record(dry):
    """Band limitation: the microphone loses the deep bass and the top is cut steeply."""
    steep = signal.ellip(12, 0.1, 80, CUTOFF_HZ, fs=SR, output="sos")
    return signal.sosfilt(steep, cut(dry, 34, "high"))


dry = scene()
out = record(dry)
int16_out(out)
```